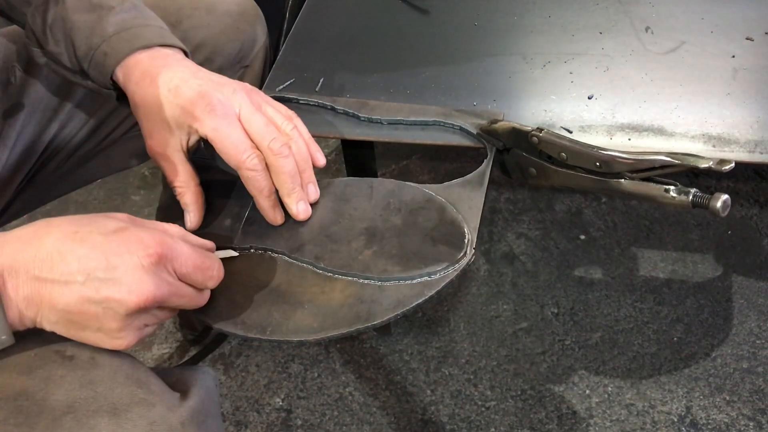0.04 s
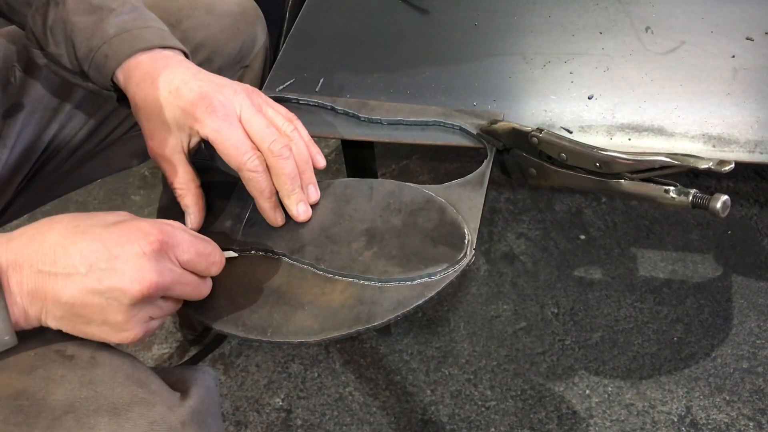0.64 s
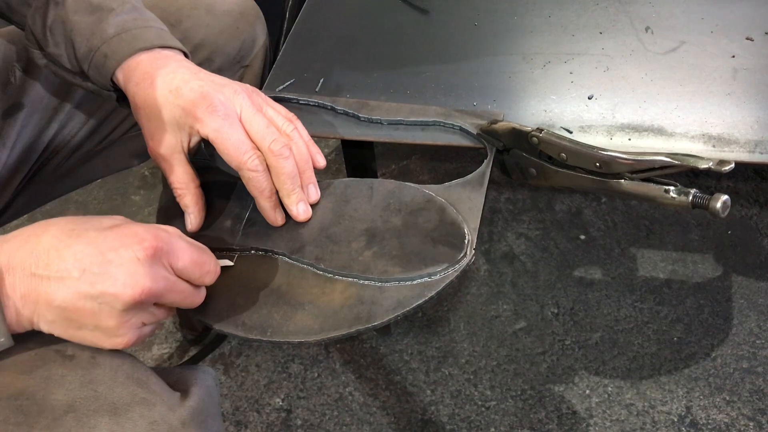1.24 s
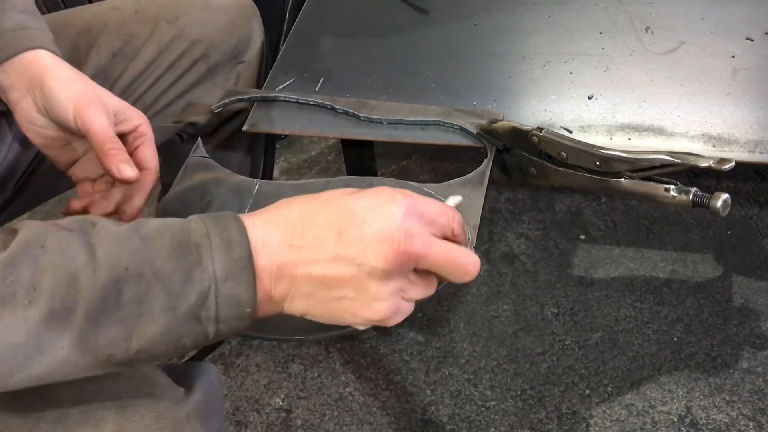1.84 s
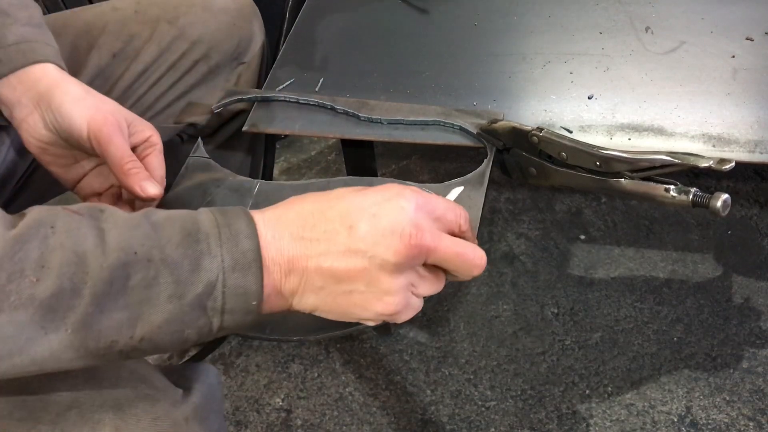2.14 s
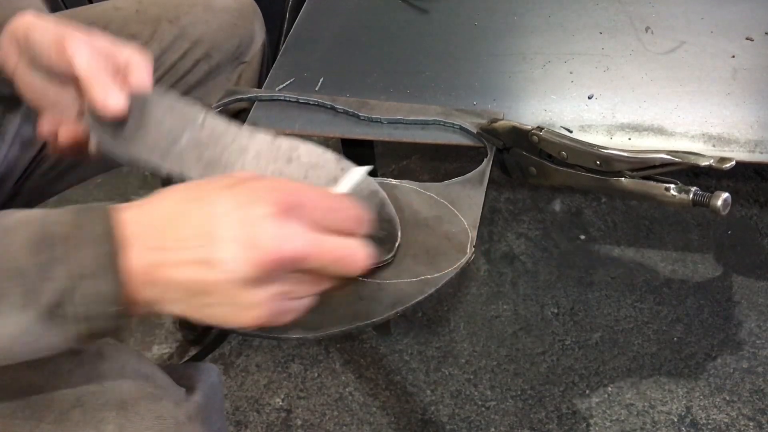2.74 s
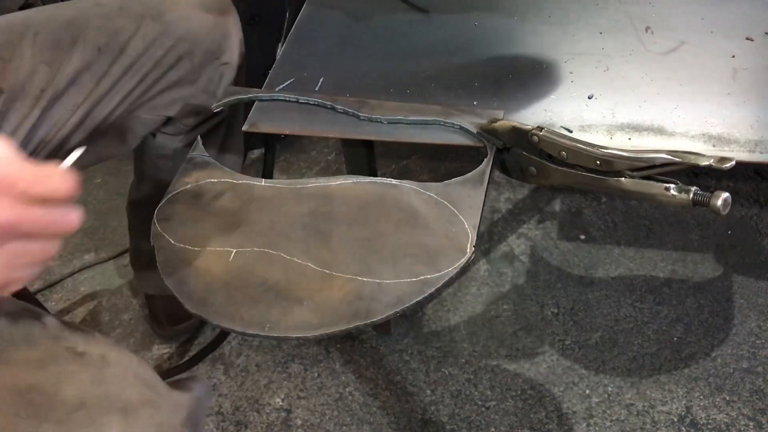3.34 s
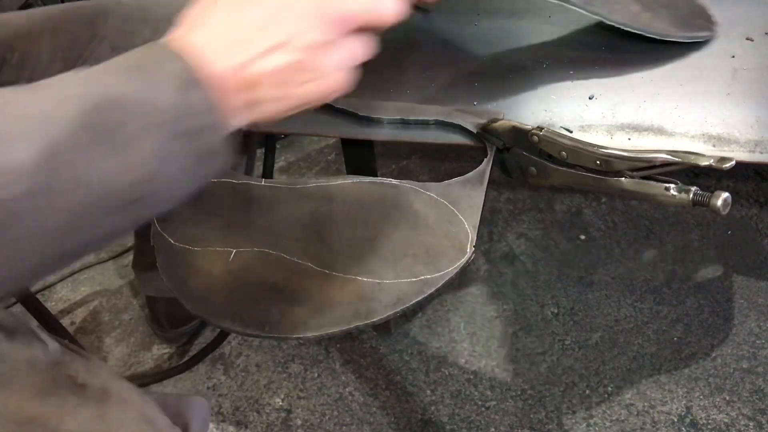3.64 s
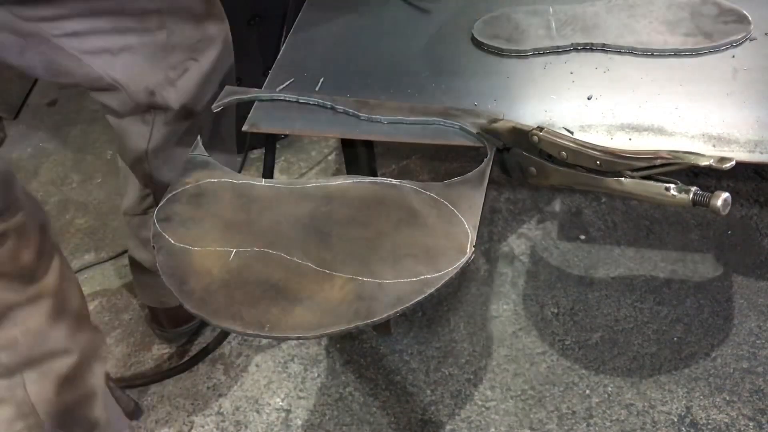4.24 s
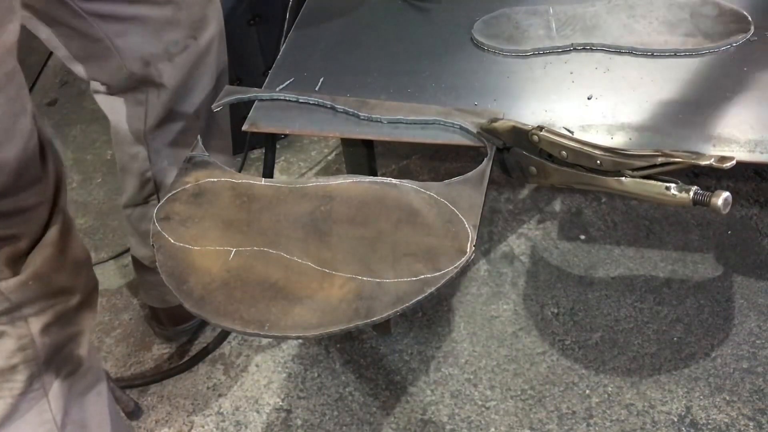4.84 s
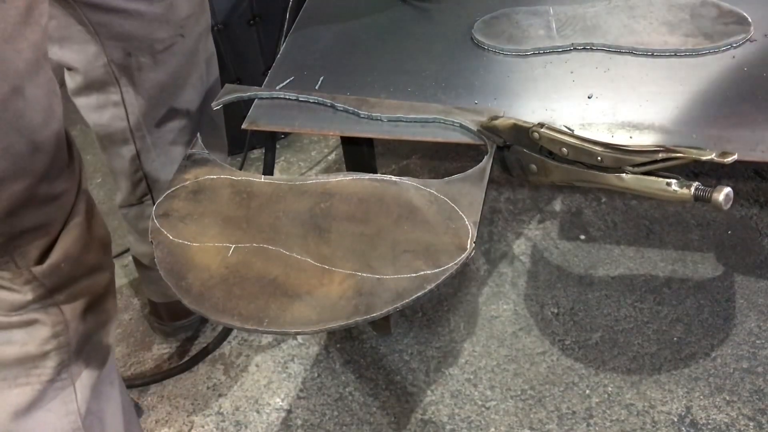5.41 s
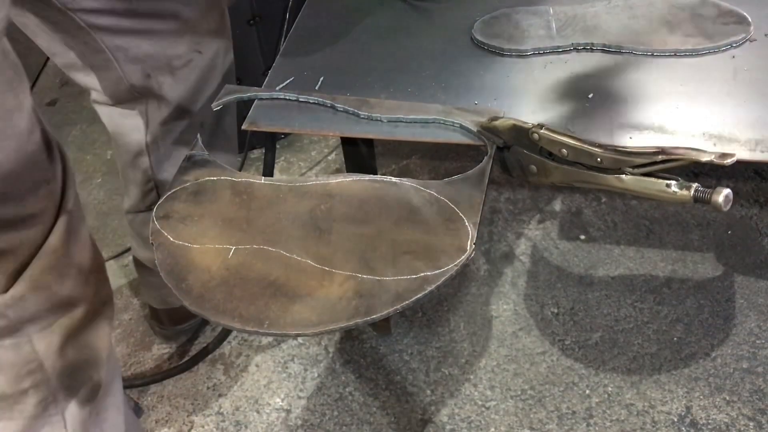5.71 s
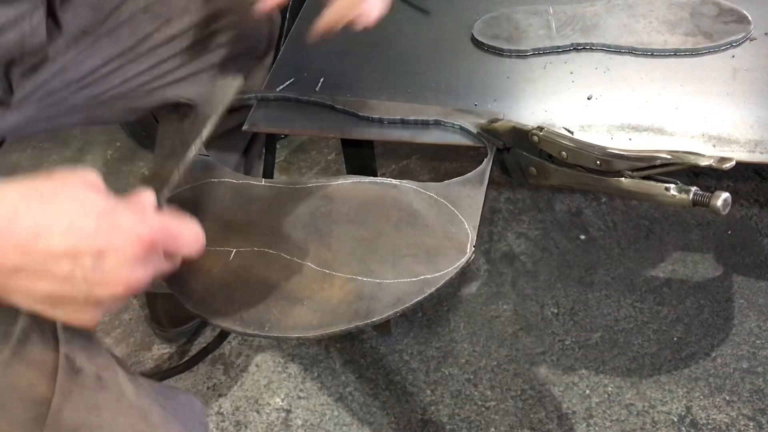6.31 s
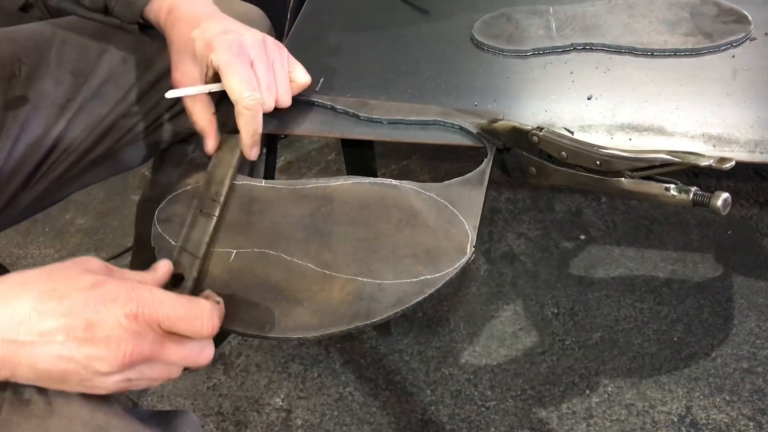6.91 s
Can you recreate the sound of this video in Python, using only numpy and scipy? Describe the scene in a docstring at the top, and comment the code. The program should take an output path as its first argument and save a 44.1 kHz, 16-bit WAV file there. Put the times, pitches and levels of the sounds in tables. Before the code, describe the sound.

After a faint chalk tick, one steel piece slides off another with a light clink, and a boot scuffs the gritty floor. The piece clanks and scrapes on a steel sheet, then drops flat, ringing loudly. Metal stock clatters softly farther off before a strip is set down with a bright clink and small scrapes. The microphone is close, and the hard-walled workshop echoes over a steady low hum.

```python
"""A low rumble, hum and faint hiss fill a metal workshop; chalk ticks near the one microphone.
Close by, a steel cut-out slides off an offcut, a boot scuffs the gritty floor, and the cut-out clanks
down on a large steel sheet. A strip is fetched from a bench a few steps away, laid on the offcut and
nudged into place. Each piece rings with a few strong modes over a thicket of weak ones; blows and
scraping grains excite them, and the hard walls answer."""
import sys
import numpy as np
from scipy import signal
from scipy.fft import rfft, irfft, next_fast_len
from scipy.io import wavfile
from scipy.ndimage import uniform_filter1d

SR = 44100
rng = np.random.default_rng(int(sys.argv[2]) if len(sys.argv) > 2 else 0)


def wav_out(sig):
    """Save sig, one row per channel (or a flat mono array), as 16-bit PCM at SR to the path in sys.argv[1]."""
    wavfile.write(sys.argv[1], SR, np.round(np.clip(np.atleast_2d(sig).T, -1, 1) * 32767).astype(np.int16))


N = 315800
BAND_LIMIT_HZ = 15950
TAIL = 65536  # samples in one ring
AGE = np.arange(TAIL) / SR

# spectra of the building's rumble and the hiss: frequency_hz, relative_db
RUMBLE = [(20, -33.5), (31, -19.5), (42, -6), (64, -2.5), (80, -8), (100, -4.5), (135, -6), (170, -13),
          (270, -13.5), (450, -21.5), (600, -20.5), (1070, -26), (2500, -38), (8000, -43)]
HISS = [(2500, -33.5), (4400, -6), (4950, -18.5), (5400, -6), (8000, -12.5), (10400, -12.5), (11700, -1),
        (12900, 1), (14000, -5), (16000, -4.5)]
# tones of the machine hum: pitch_hz, level_db
HUM = [(65, -64.5), (98, -62), (512, -74), (597, -78)]
# reflections off the floor and nearby plates: delay_s, gain
REFLECTIONS = [(.0017, 0.14), (.0031, -0.11), (.0046, .28), (.0074, 0.074)]
# colour of the room's tail, the grit and each object's weak modes: frequency_hz, relative_db
ROOM_COLOUR = [(100, 2), (1200, 1), (3500, -6), (7000, -6.5), (14000, 1.5)]
GRIT_BODY = [(71, -38), (120, -11), (217, -7), (256, -2.5), (334, -11), (630, -6), (949, -14), (1210, -5),
             (2340, -6.5), (3450, -4.5), (16000, -33)]
BENCH_BODY = [(59, -33), (100, 0.5), (140, -2.5), (224, -10), (322, -5), (471, -17), (818, -8), (1550, -11),
              (2170, -12.5), (5650, -17.5), (16000, -38.5)]
STOCK_BODY = [(59, -38), (100, -5), (170, -6), (234, -7), (424, -10.5), (492, -15), (648, -7), (991, -1.5),
              (2080, -8), (4470, -14.5), (6700, -22.5), (14700, -31), (16000, -36)]
OFFCUT_BODY = [(88, -44), (150, -4), (226, 0.5), (354, -12.5), (702, -3), (923, -8.5), (1760, -7),
               (2060, -19), (2220, -8), (3920, -16), (10600, -29), (11500, -41), (16000, -46)]
STRIP_BODY = [(120, -26), (200, -7), (416, -15), (623, -4.5), (806, -10), (1180, 3), (1810, -13.5),
              (1940, -9), (2210, -2.5), (2800, -5.5), (3190, -14), (6520, -13), (7680, -15), (15100, -51),
              (16000, -50)]
SHEET_BODY = [(47, -40), (80, -14), (102, -1), (163, -2.5), (194, 1.5), (277, -4.5), (309, 0.5),
              (482, -11.5), (550, -1.5), (1490, -4), (4330, -7.5), (5050, -11), (9190, -22), (16000, -32)]
# colour of steel faces rattling together and of a rasping edge: frequency_hz, relative_db
STEEL_CLASH = [(100, -31), (700, -13.5), (1300, -1), (2300, -3), (3200, 1.5), (4600, 1), (5500, -7),
               (7500, -8), (10000, -23.5), (16000, -21)]
STRIP_CLASH = [(120, -58), (200, -30), (590, -27), (777, -35), (1180, -19), (1530, -5), (1770, 5.5),
               (2020, -25), (2860, -29), (3130, 0), (3370, -6.5), (4860, -4), (6520, -23), (7540, -31),
               (16000, -47)]
EDGE_RASP = [(300, -27.5), (1500, -8.5), (4500, 7.5), (9500, -0.5), (10600, -7.5), (12000, 0.5),
             (16000, -10)]
# ring times by band: frequency_hz, t60_s
ROOM_RING = [(150, 1), (1200, 1), (3500, 1), (7000, 0.72), (13000, 0.19)]
GRIT_RING = [(300, 0.075), (8000, 0.12)]
BENCH_RING = [(200, 0.47), (1100, 0.64), (3000, 0.4), (10000, 0.16)]
OFFCUT_RING = [(300, 0.7), (1200, 0.21), (4000, 0.076), (12000, 0.057)]
STRIP_RING = [(300, 1), (1200, 0.31), (4000, 0.26), (12000, 0.096)]
SHEET_RING = [(150, 1.3), (500, 0.57), (1300, 1.05), (3000, 0.74), (6000, .42), (12000, 0.3)]
EDGE_RING = [(2000, .2), (12000, 0.072)]
# strong modes of the steel: pitch_hz, relative_db, t60_s
STACK_MODES = [(576, -4, .35), (685, -4, .35), (872, -1, .35), (1051, -5, .3), (1668, -1, .2),
               (1790, -1, .2), (2576, 0, .17), (2855, 1, .16), (3648, -7, .12), (4600, -9, .1)]  # two stacked pieces pinned under a hand
OFFCUT_MODES = [(596, 0, .65), (705, 0, .65), (872, -9, .5), (1132, -2, .4), (1274, -4, .4),
                (1733, -5, .45), (1762, -4, .5), (2201, -7, .55), (2267, -1, .6), (2573, -10, .4),
                (2855, -11, .4), (3266, -8, .35), (3541, -6, .35), (3786, -2, .3), (4067, -3, .3),
                (4776, -5, .27), (5025, -5, .25), (5280, -7, .25), (5830, -5, .22), (6092, -6, .22),
                (7513, -8, .2), (8085, -10, .2), (9458, -11, .18), (9801, -6, .18), (11080, -12, .17),
                (11468, -8, .17), (11615, -7, .17)]
CUTOUT_MODES = [(2514, -8, .35), (2810, -8, .4), (4091, -2, .36), (4339, -3, .25), (6401, -9, .35),
                (7343, -11, .2), (9460, -10, .17), (9892, -12, .2), (11456, -12, .15)]
STRIP_MODES = [(490, -21, .8), (614, -20, .8), (1157, -9, .6), (1199, -8, .6), (1287, -10, .4),
               (1697, -6, .45), (1751, -3, .48), (1775, -5, .45), (2156, -12, .4), (2214, -4, .42),
               (2267, -4, .4), (2815, -15, .35), (3131, 2, .24), (3157, -3, .26), (3212, -6, .24),
               (3528, -7, .23), (4141, -11, .22), (4338, -2, .2), (4674, -2, .2), (4978, -4, .22),
               (5240, -13, .2), (5884, -10, .2), (6944, -12, .18), (7506, 0, .16), (8168, -7, .15),
               (9459, -11, .18), (9789, -11, .16), (11457, -17, .16), (13400, -18, .14)]
SHEET_MODES = [(106, -15, 2.4), (139, -14, 1.9), (194, -7, 1.3), (218, -16, 1.2), (312, -3, 1),
               (419, -10, .85), (975, -5, .85), (1468, -9, .75), (1493, -7, .8), (1640, -3, .6),
               (1705, -4, .7), (1823, -5, .55), (2572, -7, .5), (2907, -4, .4), (3028, -4, .4),
               (3698, -10, .35), (4256, -3, .35), (4413, -2, .38), (4705, -5, .35), (5314, -10, .3),
               (6241, -5, .28), (6403, -2, .28), (6821, -7, .26), (6845, -8, .26), (7351, -10, .26),
               (8499, -15, .24), (8832, -7, .22), (9439, -6, .24), (9670, -10, .24), (9893, -6, .24)]
# grit bursting under the sole: start_s, level_db, crack_db
GRIT_SNAPS = [(3.264, -27, -2.5), (3.288, -24.5, 4), (3.319, -31, 0.5), (3.341, -27, 11.5),
              (3.362, -38, 2.5)]
# blows: start_s, level_db, brightness_db_per_octave, rattle_db, extra_damping_db_per_s
CHALK_TAP = [(1.356, -48, -0.5, -6, 5)]
BENCH_KNOCKS = [(4.789, -36.5, -5.5, -10, 6), (4.837, -35, -3, -2, 5), (4.886, -44, 0, 7, 15),
                (4.949, -35, 3.5, -3, 20), (5.001, -35.5, 0.5, 6.5, 20)]
STOCK_KNOCKS = [(5.234, -39.5, 2, 1, 8), (5.312, -33, -1.5, 5, 2), (5.403, -28.5, 1.5, 8, 9),
                (5.43, -31, -5, 4.5, 10), (5.786, -52, 6.5, -5, 160), (6.033, -48, 0, -5, 28),
                (6.137, -45.5, 2, -8, 19)]
OFFCUT_BLOWS = [(2.479, -35.5, 0.74, -0.5, 18), (2.497, -30, -1.3, 0, 8), (3.05, -55, 1, 0, 370)]
STRIP_BLOWS = [(6.495, -15.5, 0.64, 1, 15), (6.705, -43, 11, 0.94, 24), (6.933, -40, 3, 0, 10),
               (6.972, -34, -5.5, 0.5, 7)]
SHEET_BLOWS = [(3.561, -17, -0.5, -2.5, 12.5), (3.887, -33.5, 2, -1, 15), (3.912, -22.5, -0.3, 4, 24),
               (4.027, -8, 1.5, 2, 4.5)]
# scraping strokes: start_s, length_s, friction_db, swell_db_per_s
BOOT_SCUFF = [(3.17, 0.096, -59, 151.5), (3.262, .075, -35.5, -24)]
BENCH_SLIDE = [(4.79, 0.16, -57, 15), (4.945, 0.27, -50.5, -12)]
STOCK_SLIDE = [(5.235, 0.11, -35, -11), (5.403, 0.057, -35, -42)]
OFFCUT_SLIDE = [(2.28, 0.25, -41, 20.5)]
CUTOUT_BRUSH = [(2.745, 0.066, -55, 40)]
STRIP_SLIDE = [(6.65, .02, -46, 0), (6.835, 0.023, -47, 0), (6.933, 0.036, -37, 0), (7.01, .11, -47, 20)]
SHEET_SLIDE = [(3.562, 0.24, -33, -57), (3.887, 0.032, -39, -150)]


def amp(db):
    """Decibels to gain."""
    return 10 ** (np.asarray(db) / 20)


def unit_rms(x):
    """Scales to rms 1."""
    return x / np.sqrt(np.mean(x ** 2) + 1e-20)


def unit_energy(x):
    """Scales to energy 1."""
    return x / np.sqrt(np.sum(x ** 2) + 1e-20)


def curve_at(points, hz):
    """Reads a (frequency_hz, value) table on a log-frequency axis."""
    table_hz, values = np.transpose(points)
    return np.interp(np.log(hz + 1), np.log(table_hz + 1), values)


def add(mix, start_s, sound):
    """Mixes a sound in at start_s."""
    part = mix[max(0, round(start_s * SR)):][:len(sound)]
    part += sound[:len(part)]


def coloured(x, colour):
    """Filters by a (frequency_hz, relative_db) table."""
    size = next_fast_len(len(x))
    gain = amp(curve_at(colour, np.fft.rfftfreq(size, 1 / SR)))
    return irfft(rfft(x, size) * gain, size)[:len(x)]


def tilted(x, db_per_octave):
    """Hard contacts are bright, soft ones dull: a slope pivoting on 2 kHz."""
    octaves = np.array([-2, 0, 3])
    slope = np.c_[2000 * 2. ** octaves, db_per_octave * octaves]
    return coloured(np.pad(x, (0, 2048)), slope)[:len(x)]


def dying(x, colour, ring_times):
    """Colours a steady sound and lets each band die at its own speed."""
    hz = np.fft.rfftfreq(TAIL, 1 / SR)
    spectrum = rfft(x) * amp(curve_at(colour, hz))
    centres_hz, t60s = np.transpose(ring_times)
    out = np.zeros(TAIL)
    for one_band, t60 in zip(np.eye(len(ring_times)), t60s):
        band = irfft(spectrum * curve_at(np.c_[centres_hz, one_band], hz))
        out += band * np.exp(-np.log(1000) * AGE / t60) / np.sqrt(t60)
    return unit_energy(out)


def strong_modes(modes):
    """The clear pitches of a steel piece: decaying sines of random phase."""
    out = np.zeros(TAIL)
    for hz, db, t60 in modes:
        phase = rng.uniform(0, 2 * np.pi)
        out += amp(db) * np.exp(-np.log(1000) * AGE / t60) * np.sin(2 * np.pi * hz * AGE + phase)
    return unit_energy(out)


def object_ring(body, ring_times, count, modes=(), modes_db=0):
    """An object rings with count weak modes, closer together in the bass, plus any strong ones."""
    place = (np.arange(count) + rng.random(count)) / count
    bins = 1 + (place ** 1.5 * BAND_LIMIT_HZ * TAIL / SR).astype(int)
    strengths = place ** .25 * amp(2 * rng.standard_normal(count))  # sparser modes are stronger
    spectrum = np.zeros(TAIL // 2 + 1, complex)
    spectrum[bins] = strengths * np.exp(2j * np.pi * rng.random(count))
    thicket = dying(irfft(spectrum), body, ring_times)
    return unit_energy(thicket + amp(modes_db) * strong_modes(modes)) if len(modes) else thicket


def strike(blows, ring, clash, rattle_s, rattle_db_per_octave):
    """A blow is a short rattle of the touching faces and the ring, which a hand may damp."""
    out = np.zeros(N)
    attack = slice(0, SR // 100)  # the first 10 ms set the level
    for start_s, db, brightness, rattle_db, damping in blows:
        noise = tilted(coloured(rng.standard_normal(TAIL), clash), rattle_db_per_octave)
        rattle = unit_rms(noise) * np.exp(-AGE / rattle_s)
        damped_ring = ring / ring[attack].std() * amp(-abs(damping) * AGE)
        blow = tilted(damped_ring + amp(rattle_db) * rattle, brightness)
        add(out, start_s, amp(db) * blow / blow[attack].std())
    return out


def push(length_s, swell_db_per_s, attack_s=0.0096, release_db_per_s=330.5):
    """An edge gets up to speed, swells or fades while pushed, then friction stops it."""
    held_s, released_s = np.minimum(AGE, length_s), np.maximum(AGE - length_s, 0)
    onset = 1 - np.exp(-AGE / attack_s)
    return onset * amp(swell_db_per_s * held_s - release_db_per_s * released_s)


def scrape(strokes, ring, db_per_octave, grains_per_s, edge_db=-40):
    """Burrs catch and slip: a hail of tiny blows rings the piece and the sparse modes of its edge."""
    edge = object_ring(EDGE_RASP, EDGE_RING, count=70)
    response = unit_energy(tilted(ring, db_per_octave)) + amp(edge_db) * edge
    out = np.zeros(N)
    for start_s, length_s, db, swell in strokes:
        grains = (rng.random(TAIL) < grains_per_s / SR) * rng.standard_normal(TAIL)
        friction = amp(db) * unit_rms(grains) * push(length_s, swell)
        add(out, start_s, signal.fftconvolve(friction, response))
    return out


def room_tone(rumble_db=-50, hiss_db=-59, waver_hz=3):
    """All around the microphone: the building's rumble, steady hiss and a wavering machine hum."""
    t = np.arange(N) / SR
    rumble = amp(rumble_db) * unit_rms(coloured(rng.standard_normal(N), RUMBLE))
    hiss = amp(hiss_db) * unit_rms(coloured(rng.standard_normal(N), HISS))
    hum = np.zeros(N)
    for hz, db in HUM:
        drift_hz = waver_hz * unit_rms(uniform_filter1d(rng.standard_normal(N), size=4000))
        cycles = hz * t + np.cumsum(drift_hz) / SR
        hum += np.sqrt(2) * amp(db) * np.sin(2 * np.pi * cycles)
    return rumble + hiss + hum


def workshop_echo(direct, wet_db=-5, delay_s=.012):
    """Reflections off nearby surfaces reach the microphone first, then the hard walls' diffuse tail."""
    tail = dying(rng.standard_normal(TAIL), ROOM_COLOUR, ROOM_RING)
    out = direct.copy()
    for reflection_s, gain in REFLECTIONS:
        add(out, reflection_s, gain * direct)
    add(out, delay_s, amp(wet_db) * signal.fftconvolve(direct, tail))
    return out


def chalk():
    """Close by, the chalk ticks faintly against the stacked pieces as it is lifted."""
    ring = object_ring(OFFCUT_BODY, OFFCUT_RING, count=260, modes=STACK_MODES)
    return strike(CHALK_TAP, ring, STEEL_CLASH, rattle_s=0.0065, rattle_db_per_octave=-7)


def bench():
    """A few steps away, things shift on a bench and a strip is drawn from the steel stock on it."""
    top = object_ring(BENCH_BODY, BENCH_RING, count=800)
    stock = object_ring(STOCK_BODY, BENCH_RING, count=600)
    knocks = strike(BENCH_KNOCKS, top, BENCH_BODY, rattle_s=0.026, rattle_db_per_octave=3.5)
    clunks = strike(STOCK_KNOCKS, stock, STEEL_CLASH, rattle_s=0.018, rattle_db_per_octave=-3.5)
    shift = scrape(BENCH_SLIDE, top, db_per_octave=3, grains_per_s=1800)
    pull = scrape(STOCK_SLIDE, stock, db_per_octave=1.1, grains_per_s=1700)
    return knocks + clunks + shift + pull


def boot(damping_db_per_s=29):
    """Down on the floor, grit crunches under a turning sole."""
    ring = dying(rng.standard_normal(TAIL), GRIT_BODY, GRIT_RING)
    blows = [(start_s, db, 0, crack_db, damping_db_per_s) for start_s, db, crack_db in GRIT_SNAPS]
    snaps = strike(blows, ring, GRIT_BODY, rattle_s=0.0026, rattle_db_per_octave=0)
    return snaps + scrape(BOOT_SCUFF, ring, db_per_octave=0.3, grains_per_s=1700)


def offcut():
    """Close by, the cut-out slides off the offcut, drops over its edge and sings briefly in the hand."""
    ring = object_ring(OFFCUT_BODY, OFFCUT_RING, count=420, modes=OFFCUT_MODES, modes_db=-3.5)
    blows = strike(OFFCUT_BLOWS, ring, STEEL_CLASH, rattle_s=0.021, rattle_db_per_octave=-1.5)
    slide = scrape(OFFCUT_SLIDE, ring, db_per_octave=0.5, grains_per_s=2000, edge_db=-8.5)
    cutout = strong_modes(CUTOUT_MODES)
    sing = scrape(CUTOUT_BRUSH, cutout, db_per_octave=2.5, grains_per_s=3100, edge_db=-9)
    return blows + slide + sing


def strip():
    """Near the microphone, the steel strip clinks on the offcut and is nudged into line."""
    ring = object_ring(STRIP_BODY, STRIP_RING, count=380, modes=STRIP_MODES, modes_db=0.5)
    clinks = strike(STRIP_BLOWS, ring, STRIP_CLASH, rattle_s=0.024, rattle_db_per_octave=-0.2)
    return clinks + scrape(STRIP_SLIDE, ring, db_per_octave=-5.5, grains_per_s=3000, edge_db=-2)


def sheet(sing_db=-3):
    """Up close, the cut-out lands tip first on the sheet, sings as it is pushed and slaps down flat."""
    ring = object_ring(SHEET_BODY, SHEET_RING, count=1400, modes=SHEET_MODES, modes_db=-6.5)
    clanks = strike(SHEET_BLOWS, ring, STEEL_CLASH, rattle_s=0.025, rattle_db_per_octave=-3)
    slide = scrape(SHEET_SLIDE, ring, db_per_octave=4, grains_per_s=6200, edge_db=-2)
    sing = scrape(SHEET_SLIDE, strong_modes(CUTOUT_MODES), db_per_octave=-3.5, grains_per_s=2700)
    return clanks + slide + amp(sing_db) * sing


def scene():
    """All the handling in one workshop, at one microphone close to the steel."""
    handling = chalk() + offcut() + boot() + sheet() + bench() + strip()
    return (workshop_echo(handling) + room_tone())[None]


def record(dry):
    """The microphone chain rounds off the loudest peaks, then cuts the highest treble."""
    lowpass = signal.firwin(511, BAND_LIMIT_HZ, window=("kaiser", 9), fs=SR)
    return signal.oaconvolve(np.tanh(dry), lowpass[None], "same")


dry = scene()
out = record(dry)
wav_out(out)
```